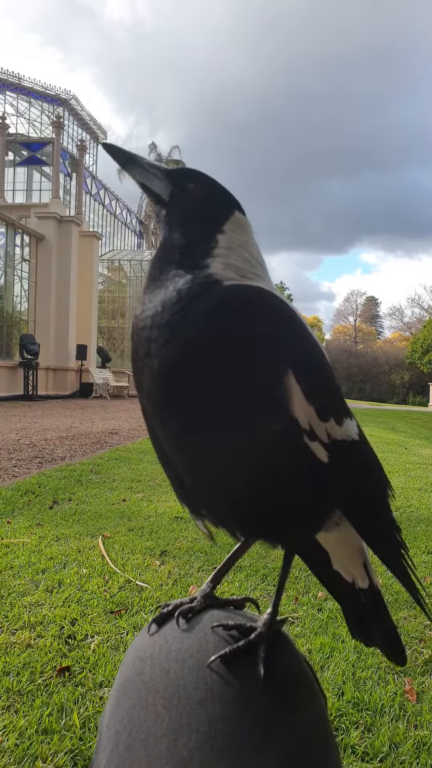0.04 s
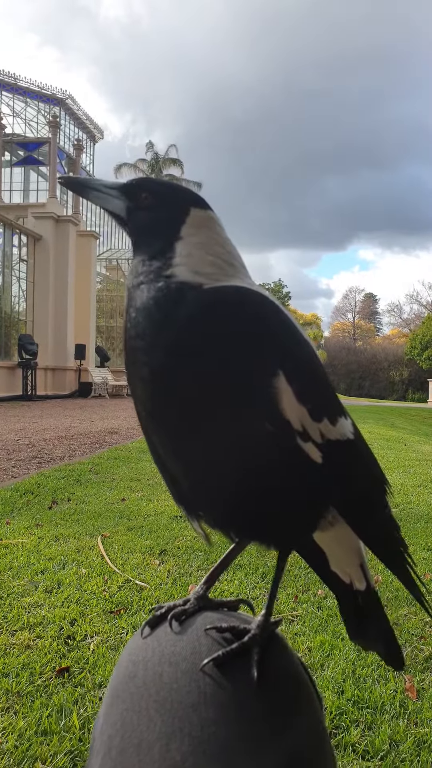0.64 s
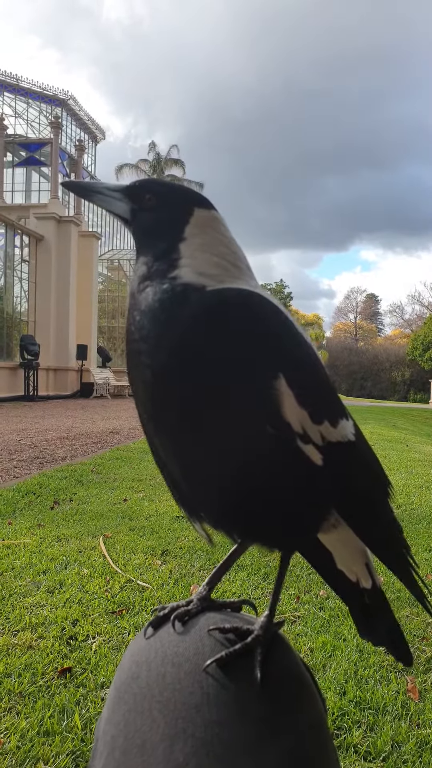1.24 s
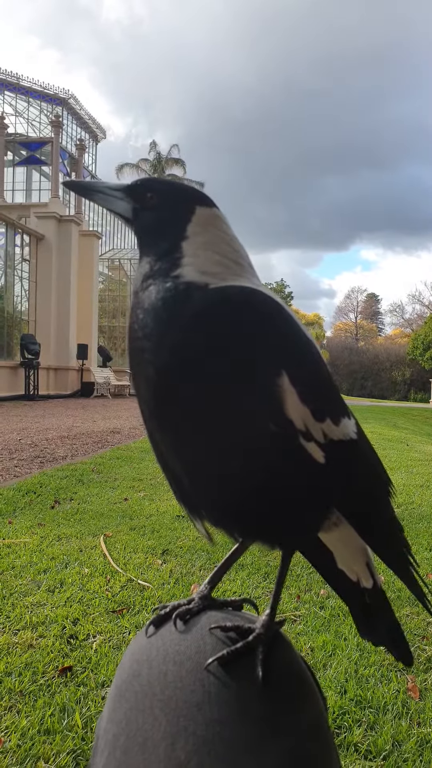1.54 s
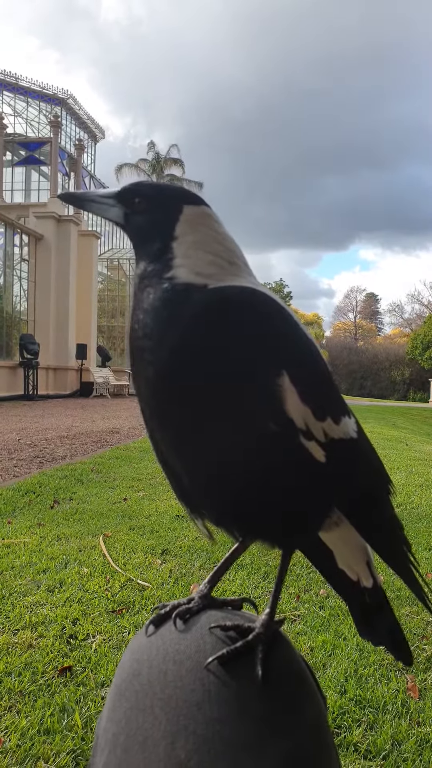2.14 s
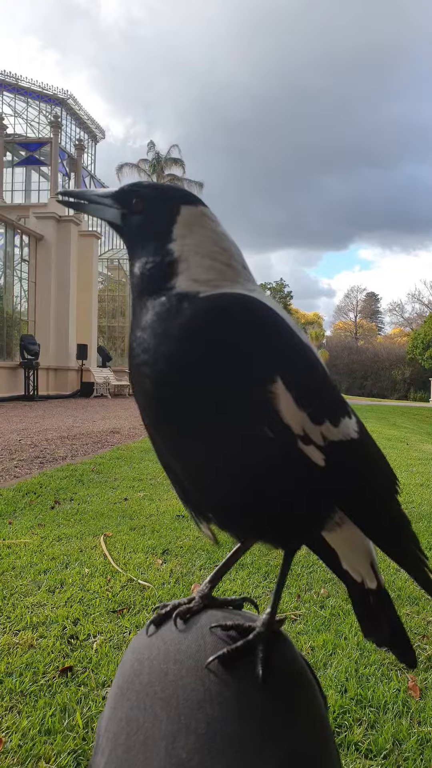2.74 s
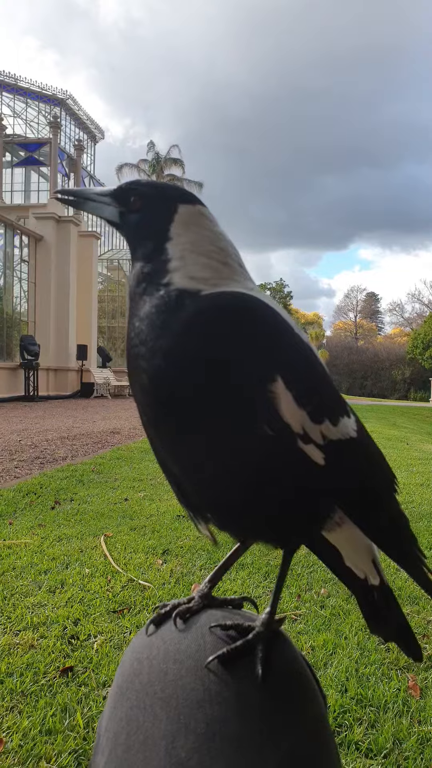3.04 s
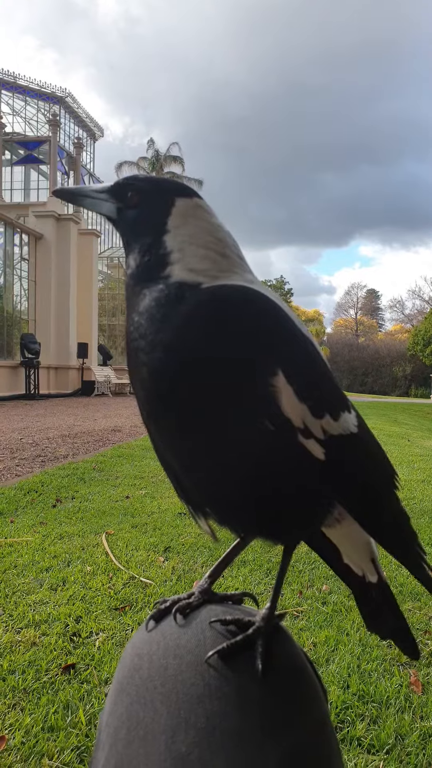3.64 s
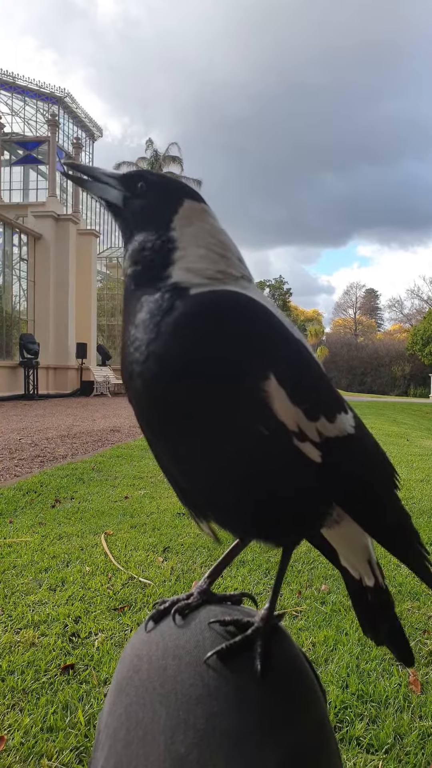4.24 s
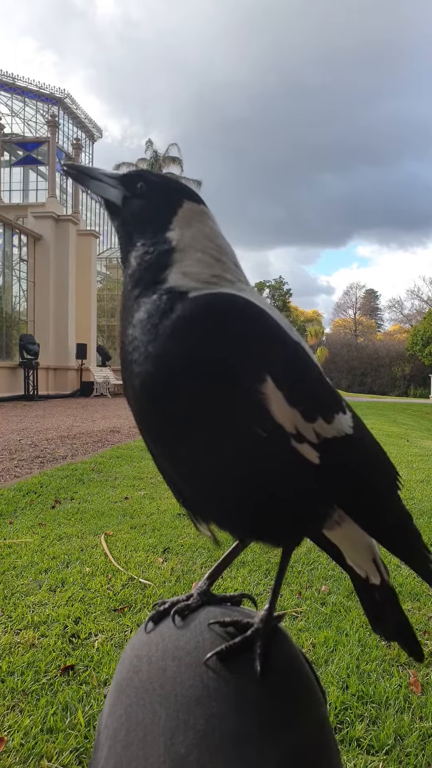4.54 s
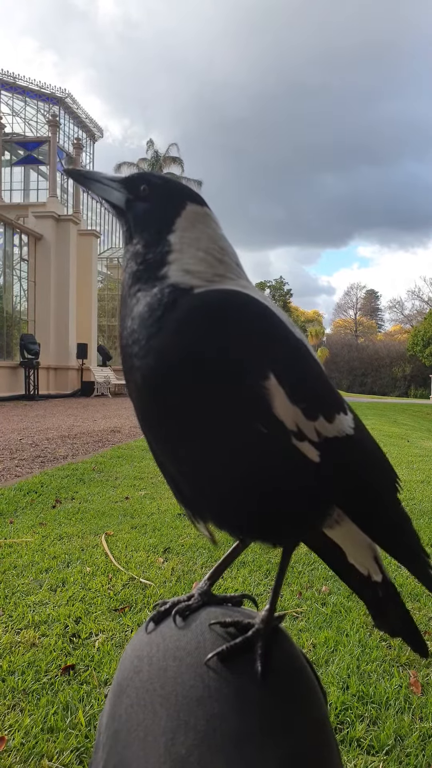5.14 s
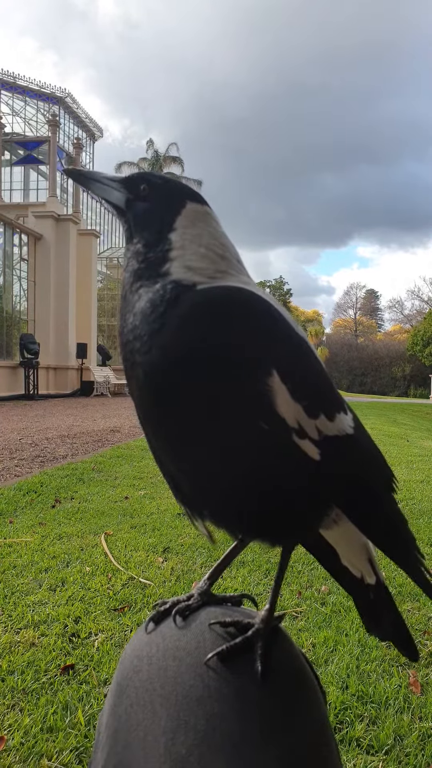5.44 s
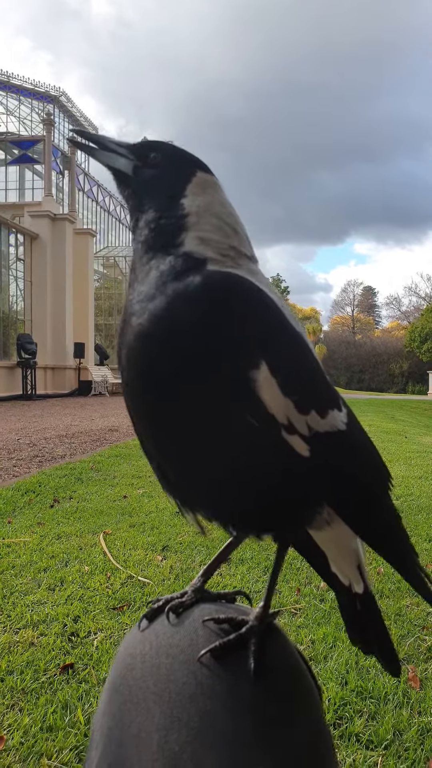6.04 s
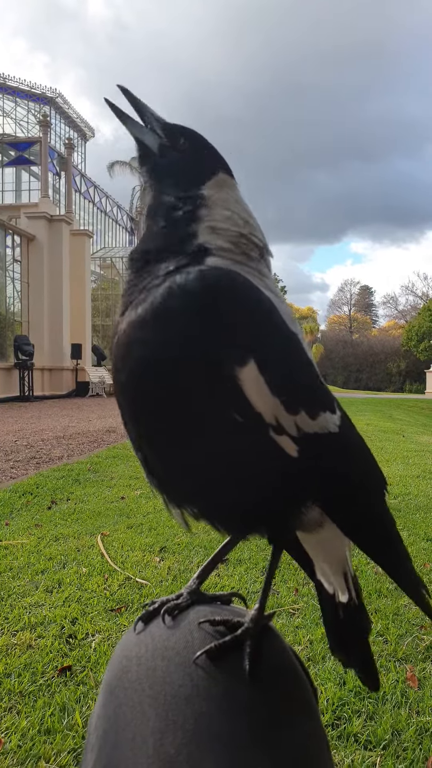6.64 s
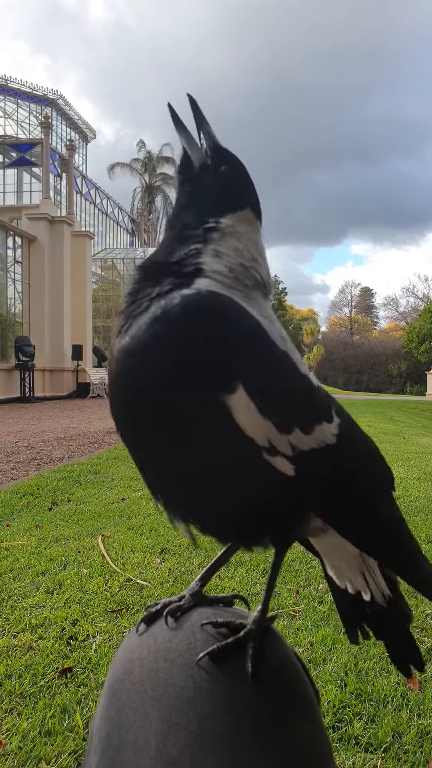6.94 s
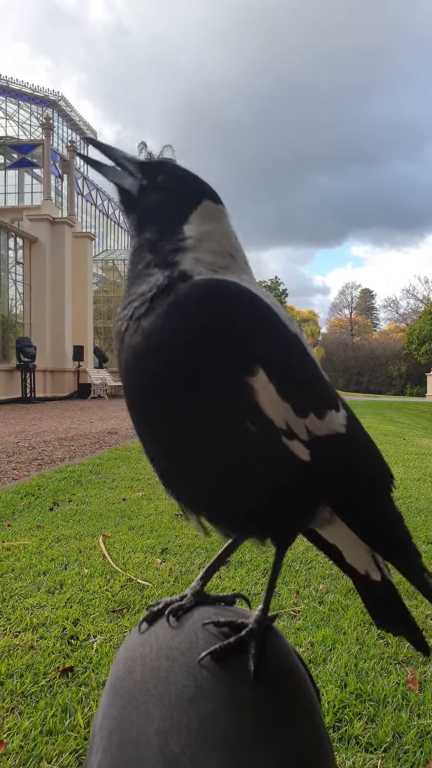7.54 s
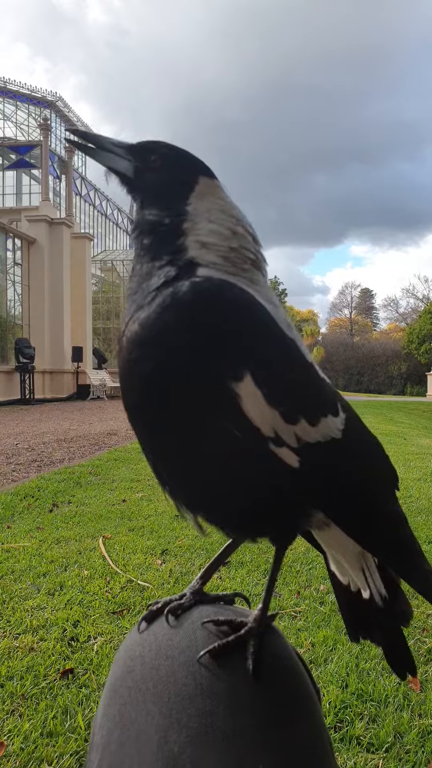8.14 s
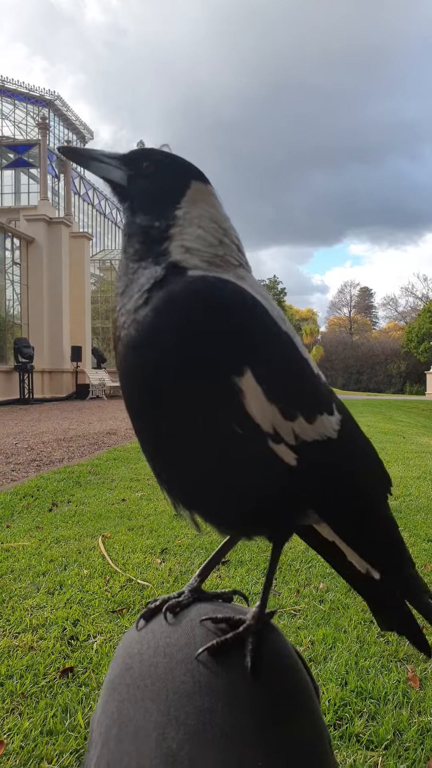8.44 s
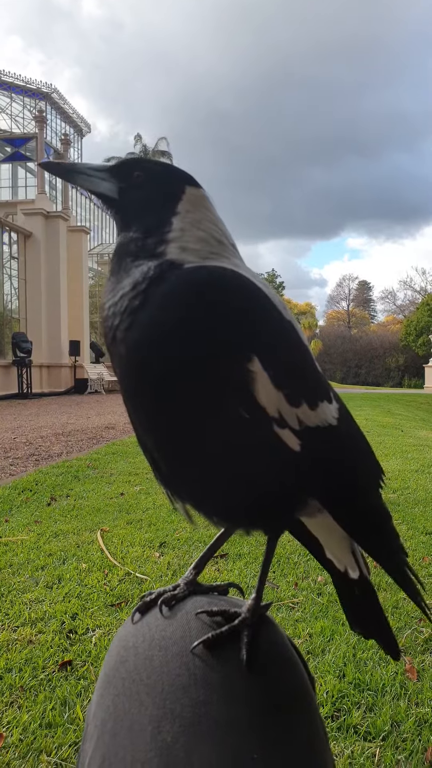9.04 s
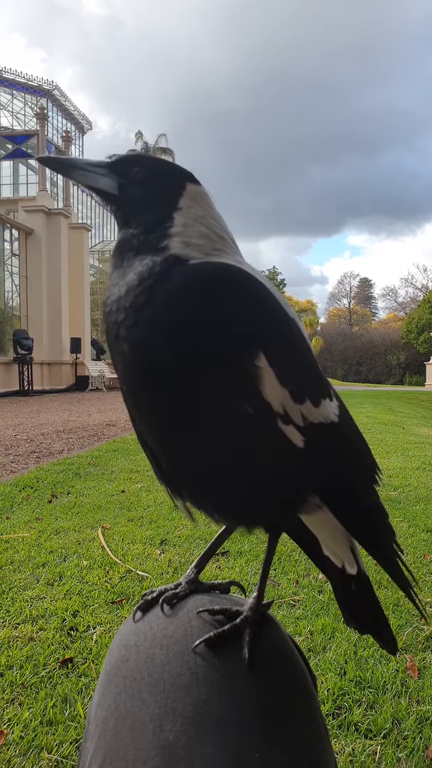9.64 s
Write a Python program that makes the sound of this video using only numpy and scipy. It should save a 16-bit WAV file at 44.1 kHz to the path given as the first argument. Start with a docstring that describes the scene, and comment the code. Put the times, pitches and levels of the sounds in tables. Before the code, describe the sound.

A light wind rumbles softly over an open lawn throughout, and distant birds squawk and twitter faintly, mostly in the first three seconds. Close to the microphone, with almost no echo, a magpie gives short, soft warbles at about 0.3, 0.6, 1 and 1.8 seconds. A fuller, slightly raspy phrase follows from 2.5 to 3.2 seconds. From 3.8 seconds it carols in fluted, overlapping notes and fast trills, pauses briefly just after 5 seconds, then resumes and builds. The loudest moment is a ringing burst near 6.7 seconds, followed by a bright, shrill trill until about 7.3 seconds. The song then sinks through lower, throaty trills and ends by 8.5 seconds. Quieter wind remains until just under 10 seconds, with two very faint far calls around 9 seconds.

```python
"""A light wind rumbles over an open lawn, and birds squawk and twitter far off.
Close by, a magpie starts with soft warbles, then carols in fluted notes and fast trills. The two sides
of its syrinx sing at once and beat against each other; their shared overtones ring in the throat.
Near 6.7 s comes a loud burst with the beak wide open. The song sinks through lower trills and ends
by 8.5 s, leaving the wind and two faint far calls."""
import sys
import numpy as np
from scipy import signal
from scipy.fft import rfft, irfft
from scipy.io import wavfile
from scipy.ndimage import uniform_filter1d, minimum_filter1d, map_coordinates

SR = 44100
rng = np.random.default_rng(int(sys.argv[2]) if len(sys.argv) > 2 else 0)


def digitize_waveform(pressure):
    """Quantize a signal to 16-bit integers and store it at the path in sys.argv[1].

    Rows of a 2-D input are taken as channels; values are limited to [-1, 1].
    """
    field = np.atleast_2d(pressure).T
    bounded = np.clip(field, -1, 1)
    quanta = np.round(bounded * 32767).astype(np.int16)
    wavfile.write(sys.argv[1], SR, quanta)


N = 431738
TIME, BINS = np.arange(N) / SR, np.fft.rfftfreq(N, 1 / SR)
CUTOFF_HZ = 15800


def gain_of(db):
    """Decibels to a factor."""
    return 10 ** (np.asarray(db) / 20)


def unit_rms(x):
    """Scales to rms 1."""
    return x / np.sqrt(np.mean(abs(x) ** 2) + 1e-20)


def spectrum(points):
    """Draws a curve across all bins on a log-frequency axis."""
    hz, value = np.transpose(points)
    return np.interp(np.log(BINS + 1), np.log(hz), value)


def follow(rows, t):
    """Reads each column of an automation curve at the times t."""
    times, *columns = np.transpose(rows)
    return [np.interp(t, times, column) for column in columns]


def equalise(x, points):
    """Filters by an EQ curve in dB."""
    return irfft(rfft(x) * gain_of(spectrum(points)), N)


def drift(hz):
    """Random motion of rms 1, rolling off above hz."""
    return unit_rms(irfft(rfft(rng.standard_normal(N)) * np.exp(-(BINS / hz) ** 2), N))


def span(start, end, fade_s):
    """The samples between two times, and a window with soft ends."""
    at = np.flatnonzero((TIME >= start) & (TIME < end))
    to_edge_s = np.minimum(TIME[at] - start, end - TIME[at])
    return at, np.sin(np.pi / 2 * np.clip(to_edge_s / fade_s, 0, 1)) ** 2


def wind(gust_db=2, rumble_hz=200):
    """Wind and distant air: a lumpy rumble under a smooth far hiss."""
    # level of the rumble and hiss, which ducks after the loud burst and slowly comes back: t/s, level/dB
    bed_level = [(0, -49), (2.9, -41.5), (5, -48.5), (6.5, -45), (7.3, -59.5), (8.5, -59), (9.79, -52.5)]
    # colour of the air: f/Hz, relative level/dB
    air_eq = [(20, -14), (60, 2.5), (115, -5), (155, -1), (200, -11), (420, -25), (1000, -28), (2000, -38),
              (3500, -46), (5800, -48), (7200, -60), (15800, -60)]
    # how alike left and right are: f/Hz, correlation
    likeness = [(50, .55), (200, .92), (6000, .4)]
    left, spread = rfft(rng.standard_normal((2, N)))
    shared = spectrum(likeness)
    right = shared * left + np.sqrt(1 - shared ** 2) * spread
    air = unit_rms(irfft(np.array([left, right]) * gain_of(spectrum(air_eq)), N))
    rumble = irfft(rfft(air) / (1 + (BINS / rumble_hz) ** 4), N)
    hiss = air - rumble
    db, = follow(bed_level, TIME)
    return gain_of(db) * (hiss + rumble * gain_of(gust_db * drift(3.9)))


def far_birds(arch=0.24, ragged_db=3):
    """Arched and falling calls whose pitch twitters and rasps."""
    # calls and squawks: start/s, length/s, top pitch/Hz, level before EQ/dB, crest place/0-1, rasp/0-1
    calls = [(0.078, .105, 1286, -58, 0.6, 0.95), (0.213, 0.1, 1458, -60, .5, 1),
             (1.41, .09, 2450, -61, 0.1, 0.4), (1.492, 0.13, 2980, -57.5, 0.52, 0.23),
             (1.901, 0.072, 1326, -65, 0.55, 0.3), (2.17, 0.1, 2560, -63, 0.7, .35),
             (2.268, 0.058, 3720, -56, 0.82, .15), (2.353, 0.022, 3610, -52.5, 0.54, 0.2),
             (2.359, 0.05, 6020, -54, 0.6, 0), (2.914, .09, 2232, -59.5, 0.4, 0.2),
             (3.042, 0.08, 2270, -65, .35, 0.1), (3.2, 0.09, 2880, -66, .25, 0.1),
             (5.252, 0.11, 4060, -59.5, 0.5, 0.36), (5.337, 0.094, 3080, -60, 0.03, 0.54),
             (8.733, .16, 2855, -76, 0.66, .12), (8.987, 0.36, 2560, -79.5, 0.33, 0.79)]
    # colour of the far voices: f/Hz, gain/dB
    far_eq = [(1300, -22), (2400, 3.5), (5400, 2.5), (7200, -18)]
    out = np.zeros(N)
    wobble = .055 * drift(45) + .025 * drift(500)
    hiss = rng.standard_normal(N)
    for start, length, top_hz, db, crest, rasp in calls:
        at, window = span(start, start + length, fade_s=0.11 * length)
        progress = (TIME[at] - start) / length
        hz = top_hz * (1 + rasp * wobble[at]) * (1 - arch * (progress - crest) ** 2)
        phase = 2 * np.pi * np.cumsum(hz) / SR
        voice = sum(np.sin(k * phase) for k in range(1, int(CUTOFF_HZ / top_hz) + 1))
        out[at] += gain_of(db) * window * ((1 - rasp / 2) * voice + 2 * rasp * hiss[at])
    return equalise(out * gain_of(ragged_db * drift(74)), far_eq)


def garden_echo(x, t60_s, onset_s=0.022):
    """Scattered stereo echoes from the ground, trees and walls."""
    t = TIME[:SR]
    reflections = rng.standard_normal((2, SR)) * (rng.random((2, SR)) < .05)
    tail = reflections * gain_of(-60 * t / t60_s) * (1 - np.exp(-t / onset_s))
    return signal.fftconvolve(x[None], tail / np.linalg.norm(tail[0]), axes=1)[:, :N]


def magpie(throb=0.55, breath_db=1):
    """Both voices share an airflow that closes once a cycle, adding overtones and sum tones."""
    # the mellow overtones under every note: f/Hz, gain/dB
    mellow_eq = [(600, -89.5), (1300, -21.5), (1750, -23), (2300, -32.5), (4500, -48), (9000, -65.5)]
    # colour of the rasp: f/Hz, gain/dB
    rasp_eq = [(500, -35), (800, 0), (1700, 0), (2600, -10), (7000, -38)]
    bend, dip_db = flutter()
    tone, hoarse = syrinx(bend, dip_db), hoarseness()
    envelope = abs(tone)
    phase_step = np.angle(tone * np.roll(tone, 1).conj())
    pitch_hz = abs(uniform_filter1d(phase_step, size=40)) * SR / (2 * np.pi)
    # beats and rasps upset the closing, so the overtones turn hoarse
    unfluttered = envelope / gain_of(dip_db)
    beating = unfluttered / (uniform_filter1d(unfluttered, size=600) + 1e-6)
    upset = uniform_filter1d(abs(beating - 1), size=600) + hoarse
    phase = np.angle(tone) + (.15 * upset + .4 * hoarse) * drift(700)
    overtones = sum(np.cos(k * phase) * np.clip((SR / 2 - k * pitch_hz) / 3000, 0, 1)
                    for k in range(2, 21))
    breath = gain_of(breath_db) * upset * rng.standard_normal(N)
    buzz = envelope * np.minimum(beating, 1) * (overtones + breath)  # a choked tone is purer
    buzz *= gain_of(throb * dip_db)  # overtones flutter more deeply than the note
    rasp = equalise(envelope * hoarse ** 2 * rng.standard_normal(N), rasp_eq)
    bright = equalise(buzz, mellow_eq) + throat(buzz) + rasp
    # the beak beams its overtones away, so part of them arrives scattered by things nearby
    scattered = garden_echo(bright, t60_s=0.061, onset_s=0.0013)[0]
    return tone.real + bright + gain_of(-10) * scattered


def syrinx(bend, dip_db, shimmer_db=0.9361, jitter=.0042, settle_s=0.013):
    """All notes as near-pure complex tones; where two overlap they beat."""
    # short notes from either side of the syrinx:
    # start/s, end/s, first pitch/Hz, last pitch/Hz, arch/share of pitch, peak level/dB, peak place/0-1
    short_notes = [(0.264, 0.355, 949, 1215, 0.16, -30.5, 0.74),
                   (0.268, 0.369, 494, 749, 0.16, -24.5, 0.74), (0.595, 0.693, 810, 1057, 0.13, -43.5, 0.9),
                   (0.638, 0.689, 1646, 1508, 0.019, -23, 0.42), (0.95, 1.051, 514, 700, 0.18, -25, 0.71),
                   (0.954, 1.047, 1180, 1302, 0.052, -27.5, 0.4),
                   (1.774, 1.832, 1266, 1445, 0.13, -30.5, 0.76),
                   (1.799, 1.85, 1220, 1290, -0.082, -36.5, 0.55),
                   (1.819, 1.849, 1360, 2090, 0.018, -29.5, 0.3),
                   (1.848, 1.876, 1940, 1385, 0.028, -27, 0.53),
                   (2.488, 2.536, 740, 832, -0.0013, -26, 0.37),
                   (2.53, 2.615, 1054, 1033, 0.054, -17, 0.35), (2.581, 2.668, 1080, 1034, -0.24, -22, 0.7),
                   (2.608, 2.793, 1144, 1210, 0.025, -19, 0.62),
                   (2.772, 2.801, 1092, 720, -0.051, -19, 0.2), (2.799, 2.817, 1210, 1770, 0.021, -25, 0.3),
                   (2.8, 2.903, 771, 611, 0.24, -38, 1), (2.81, 2.906, 1720, 1750, 0.056, -35.5, 1),
                   (2.896, 2.959, 1013, 635, 0.36, -23.5, 0.37),
                   (2.91, 2.927, 1697, 1082, -0.15, -15.5, 0.97),
                   (3.064, 3.144, 1200, 1650, -0.035, -35.5, 0.5),
                   (3.067, 3.144, 1036, 840, -0.29, -35.5, 1), (3.119, 3.18, 990, 1047, 0.0017, -21.5, 0.6),
                   (3.409, 3.489, 825, 823, -0.051, -24, 0.71),
                   (3.992, 4.19, 1461, 1420, -0.094, -24.5, 0.8),
                   (4.268, 4.474, 1254, 1217, 0.0048, -24, 1), (4.45, 4.538, 1260, 1261, -0.097, -13, 0.77),
                   (4.641, 4.73, 866, 748, -0.039, -25.5, 0.06),
                   (4.679, 4.714, 1080, 1141, -0.024, -12.5, 0.77),
                   (4.688, 4.746, 1360, 1079, 0.24, -22.5, 1), (4.762, 5.022, 782.5, 860, -0.13, -17, 0.34),
                   (5.344, 5.492, 1223, 1220, -0.066, -29.5, 0.28),
                   (5.455, 5.472, 826, 1370, 0.19, -25.5, 0.25),
                   (5.471, 5.569, 1770, 1620, 0.11, -33.5, 0.45),
                   (5.572, 5.733, 1000, 1018, -0.006, -16.5, 0.84),
                   (5.595, 5.756, 833, 865.5, 0.031, -22, 0.5), (5.743, 5.798, 890, 2163, -0.13, -27, 0.12),
                   (5.775, 5.852, 1256, 1065, 0.1, -31.5, 0.44),
                   (5.809, 5.874, 1039, 1105, -0.052, -16, 0.67),
                   (5.949, 6.012, 1305, 1347, 0.0084, -20, 0.56), (6.007, 6.118, 1746, 1110, -0.11, -29, 1),
                   (6.066, 6.207, 839.4, 877.4, 0.0047, -15, 0.5),
                   (6.281, 6.314, 669, 438, 0.51, -34, 0.56), (6.297, 6.334, 1553, 890, -0.25, -28.5, 0.1),
                   (6.335, 6.409, 659, 651, -0.069, -25, 0.25),
                   (6.401, 6.445, 1223, 1300, 0.0098, -24, 0.55),
                   (6.445, 6.466, 1473, 1536, -0.041, -22.5, 1),
                   (6.461, 6.621, 1160, 1032, 0.0095, -12, 0.44),
                   (6.544, 6.693, 992, 1039, -0.23, -18, 0.83), (6.666, 6.687, 1204, 1204, -0.032, 2.5, 1),
                   (6.689, 6.72, 1230, 1430, 0.2, -16, 0.26), (6.812, 6.834, 1696, 1471, 0.036, -17, 0.84),
                   (6.827, 6.93, 1451, 1155, 0.1, -17.5, 0.62),
                   (7.236, 7.412, 1640, 1638, -0.031, -19, 0.52),
                   (7.392, 7.504, 1202, 1236, -0.066, -10.5, 0.6),
                   (7.571, 7.916, 1005, 960.5, -0.076, -16.5, 0.34),
                   (7.858, 7.899, 1126, 1018, 0.061, -18, 1),
                   (7.899, 7.934, 1746, 1326, 0.033, -24.5, 0.48),
                   (7.943, 8.254, 845.4, 776, -0.0055, -17, 0.68),
                   (8.274, 8.326, 813, 855, -0.019, -22, 0.1), (8.297, 8.372, 1080, 1300, 0, -35.5, 0.4),
                   (8.359, 8.445, 741.5, 653.6, 0.03, -20.5, 0.27)]
    # long slurs, a carol and the three parts of the climax: t/s, pitch/Hz, level/dB
    carol = [(3.785, 1339, -46), (3.822, 1086, -24), (3.86, 972, -16), (3.915, 988, -17),
             (3.975, 912.5, -28.5), (4.145, 985.4, -25.5), (4.195, 906.5, -13), (4.262, 882.5, -14.5),
             (4.285, 975, -28.5), (4.49, 1051, -33.5)]
    shout = [(6.697, 1187, -17.5), (6.725, 1250, 3.5), (6.746, 1223, 8.5), (6.802, 1273, -5),
             (6.813, 1230, -20)]
    growl = [(6.805, 1048, -18.5), (6.848, 988, -25), (6.884, 1118, -18.5), (6.925, 1040, -9.5),
             (6.963, 1097, -9.5), (7, 1085, -18)]
    shrill = [(6.97, 1300, -21), (7.067, 1274, -5.5), (7.242, 1266, -7.5), (7.265, 1215, -26.5),
              (7.383, 1258, -65.5)]
    notes = [slur(curve) for curve in (carol, shout, growl, shrill)]
    notes += [glide(*row) for row in short_notes]
    shake, shimmer = drift(350), drift(150)
    tone = np.zeros(N, complex)
    for at, window, hz, db in notes:
        # softly blown notes and beginnings are throaty, firmly blown ones clear
        softness = gain_of(-0.67 * (db + 18.5))
        onset = np.exp(-(TIME[at] - TIME[at[0]]) / settle_s)
        rough = np.clip(softness + 1.5 * onset, .8, 7)
        cycles = np.cumsum(hz * bend[at] * (1 + jitter * rough * shake[at])) / SR + rng.random()
        level = gain_of(db + dip_db[at] + shimmer_db * rough * shimmer[at])
        tone[at] += window * level * np.exp(2j * np.pi * cycles)
    return tone


def glide(start, end, first_hz, last_hz, arch, peak_db, peak_at, swell_db=16.5, held_s=0.16):
    """One short note: pitch slides along an arc while the breath pressure swells and sinks."""
    length = end - start
    at, window = span(start, end, fade_s=max(.13 * length, .004))
    progress = (TIME[at] - start) / length
    arc = 1 + arch * (1 - (2 * progress - 1) ** 2)
    hz = (first_hz + (last_hz - first_hz) * progress) * arc
    peak_at = np.clip(peak_at, .03, .97)
    from_peak = np.maximum((peak_at - progress) / peak_at, (progress - peak_at) / (1 - peak_at))
    depth_db = swell_db * min(1, (held_s / length) ** 2)  # longer notes are held more evenly
    return at, window, hz, peak_db - depth_db * from_peak ** 2.61


def flutter(sharpness=2.8, fade_s=.008):
    """Each squeeze of the syrinx lifts the pitch and chokes the tone; a negative dip swells it."""
    # trills, each starting on a pitch crest: start/s, end/s, rate/Hz, swing/share of pitch, dip/dB
    trills = [(0.294, 0.354, 46.8, 0.13, 11), (0.946, 1.045, 40.2, 0.128, 12.5),
              (2.542, 2.599, 52, 0.079, 13.5), (2.604, 2.653, 52.6, 0.21, 8),
              (3.965, 4.138, 125.4, 0.14, -0.5), (4.78, 5.025, 49.25, 0.39, 5),
              (6.483, 6.597, 78.7, 0.21, 8), (6.6, 6.667, 114.3, 0.28, -10), (7, 7.121, 99.2, 0.105, -2.6),
              (7.121, 7.233, 90.9, 0.105, -2.4), (7.402, 7.488, 68, 0.13, 7.5),
              (7.597, 7.896, 70.94, 0.093, -1), (7.96, 8.209, 46.43, 0.22, 6)]
    bend, dip_db = np.ones(N), np.zeros(N)
    for start, end, rate, swing, depth_db in trills:
        at, window = span(start - fade_s / 2, end + fade_s / 2, fade_s)
        squeeze = abs(np.cos(np.pi * rate * (TIME[at] - start))) ** sharpness
        bend[at] += swing * window * (squeeze - .27)
        dip_db[at] -= depth_db * window * (squeeze - .24)
    return bend, dip_db


def stereo_pickup(song, notch_hz=1240, width=0.19, notch_floor=0.3):
    """The right side hears the bird later, and a near reflection notches one narrow band there."""
    # the right side against the left: f/Hz, gain/dB
    right_eq = [(600, -8), (870, -4), (1600, -5), (2200, -12.5), (4200, -1), (9000, -11), (14000, -3)]
    # its lag, which grows as the bird lifts its head: t/s, delay/ms
    right_lag = [(5, .185), (6.6, .227)]
    detune = 1j * (BINS / notch_hz - notch_hz / (BINS + 1))
    notch = (detune + notch_floor * width) / (detune + width)
    right = irfft(rfft(song) * gain_of(spectrum(right_eq)) * notch, N)
    lag_ms, = follow(right_lag, TIME)
    delayed = map_coordinates(right, [(TIME - lag_ms / 1000) * SR], order=5)
    return np.array([song, delayed])


def hoarseness():
    """How chaotically the syrinx vibrates at each moment."""
    # stretches where the voice breaks into a rasp: start/s, end/s, hoarseness/0-1
    rasps = [(2.78, 3.14, .38), (4.675, 4.735, .45), (4.78, 5.01, .2), (5.45, 5.85, .28), (6, 6.42, .26),
             (6.49, 6.67, .32), (6.66, 6.722, .36), (6.803, 6.834, .55), (6.968, 7.025, .28),
             (7.95, 8.43, .2)]
    out = np.zeros(N)
    for start, end, amount in rasps:
        at, window = span(start, end, fade_s=.008)
        out[at] += amount * window
    return out


def slur(curve):
    """One long legato note that follows its own smoothed pitch and level."""
    at, window = span(curve[0][0], curve[-1][0], fade_s=0.004)
    hz, db = (uniform_filter1d(column, size=220) for column in follow(curve, TIME[at]))
    return at, window, hz, db


def throat(buzz, stage_q=5.5, reshape_s=0.03):
    """Throat and beak change shape for each phrase and ring at their resonances."""
    # shape of each phrase: start/s, end/s, resonances as (f/Hz, gain/dB)
    shapes = [(3.971, 4.188, [(4480, -19), (6900, -30.5)]), (4.163, 4.29, [(5400, -37), (8200, -46.5),
              (12700, -38.5)]), (4.285, 4.537, [(4400, -24.5), (6600, -37.5)]),
              (4.674, 4.753, [(4450, -21.5)]), (4.779, 5.037, [(5750, -36), (9300, -40.5), (11900, -43.5),
              (15400, -47)]), (5.618, 5.761, [(3900, -30.5)]), (6.087, 6.212, [(5600, -38), (7800, -41)]),
              (6.531, 6.754, [(4050, -23), (8600, -41.5)]), (6.661, 6.801, [(3750, -21), (4900, -27.5),
              (7350, -30), (9750, -34)]), (6.791, 6.923, [(4330, -8.5)]), (6.862, 6.985, [(4200, -22.5),
              (9700, -35)]), (6.933, 7.31, [(2750, -29.5), (4120, -11.5), (6500, -28), (10100, -37.5),
              (15300, -42.5)]), (7.24, 7.52, [(4600, -31)]), (7.603, 7.913, [(2780, -26.5), (3850, -25),
              (5700, -30.5), (7700, -31.5), (11500, -35.5)]), (7.867, 7.962, [(4350, -16)]),
              (7.942, 8.485, [(5050, -24.5), (9900, -36.5), (12000, -36), (14300, -40.5)])]
    out = np.zeros(N)
    for start, end, resonances in shapes:
        at, window = span(start, end, reshape_s)
        for hz, db in resonances:
            b, a = signal.iirpeak(hz, stage_q, fs=SR)
            ring = signal.lfilter(b, a, signal.lfilter(b, a, buzz[at]))
            out[at] += gain_of(db) * window * ring
    return out


def scene():
    """The near bird almost dry, the far ones ringing among the trees, over a bed of wind."""
    song, far_calls = magpie(), far_birds()
    far_echo = gain_of(1) * garden_echo(far_calls, t60_s=.55)
    song_echo = gain_of(-31) * garden_echo(song, t60_s=1.0)
    return wind() + far_calls + far_echo + stereo_pickup(song) + song_echo


def record(dry, ceiling=0.81):
    """A limiter holds the loudest note, then a low-pass trims the very top."""
    peak = -minimum_filter1d(-abs(dry).max(0), size=600)
    limited = dry / np.maximum(uniform_filter1d(peak, size=600) / ceiling, 1)
    low_pass = signal.firwin(511, CUTOFF_HZ, window=("kaiser", 9), fs=SR)
    return signal.oaconvolve(limited, low_pass[None], "same")


dry = scene()
out = record(dry)
digitize_waveform(out)
```